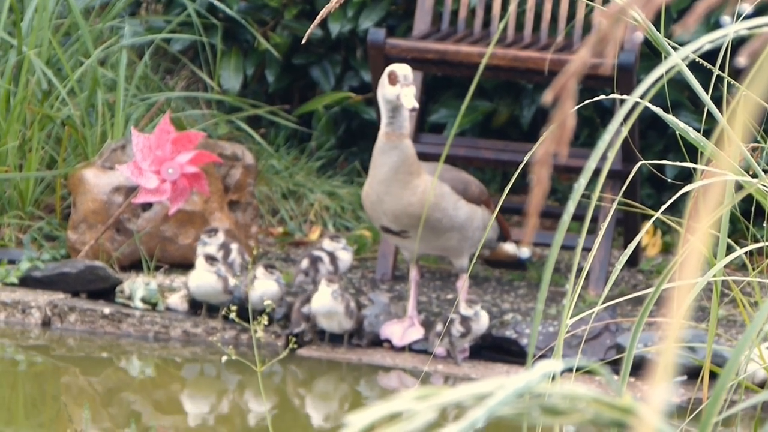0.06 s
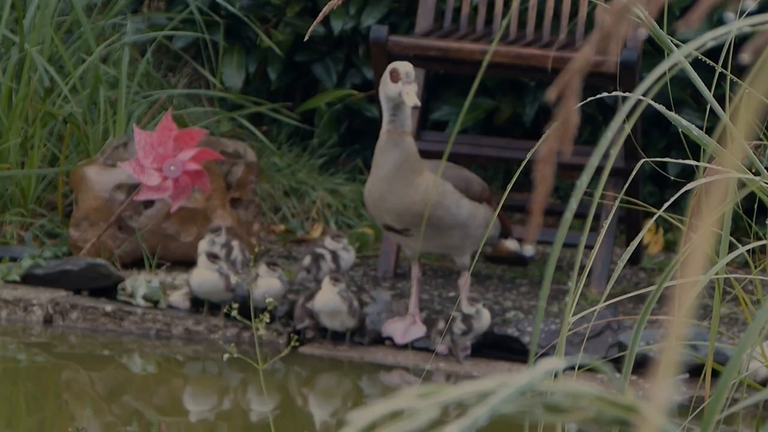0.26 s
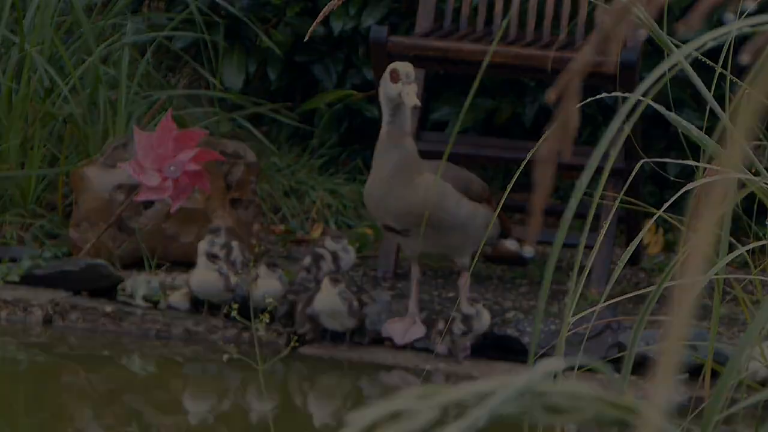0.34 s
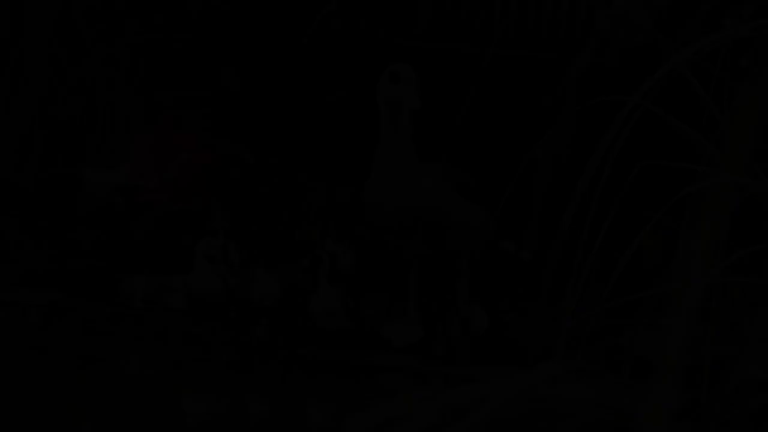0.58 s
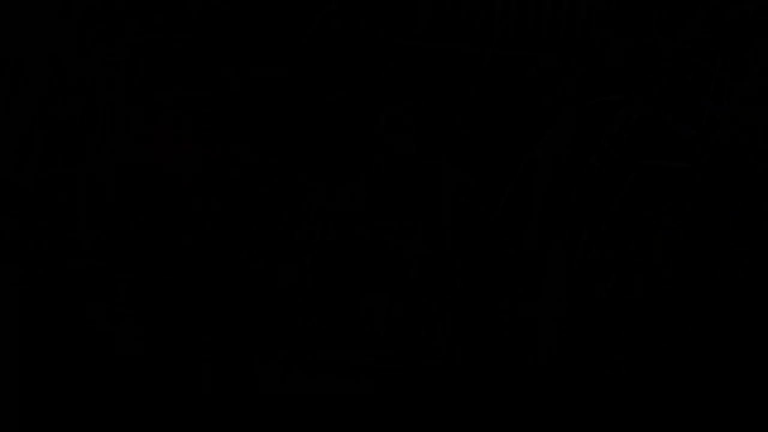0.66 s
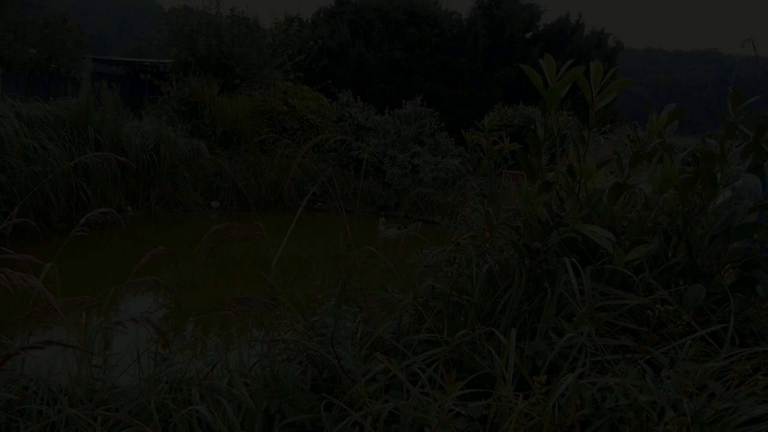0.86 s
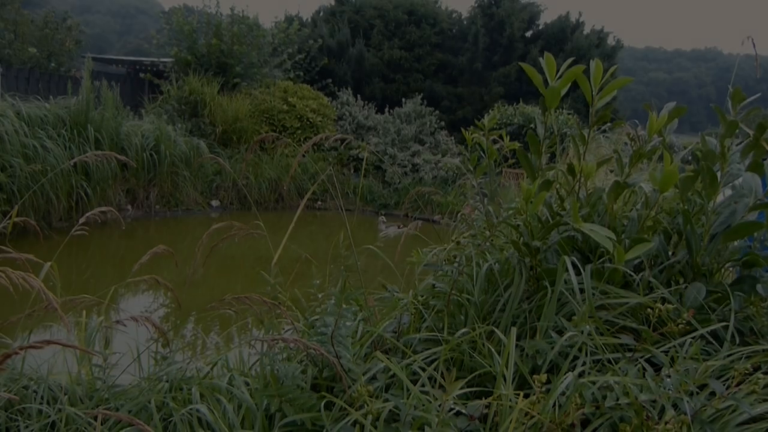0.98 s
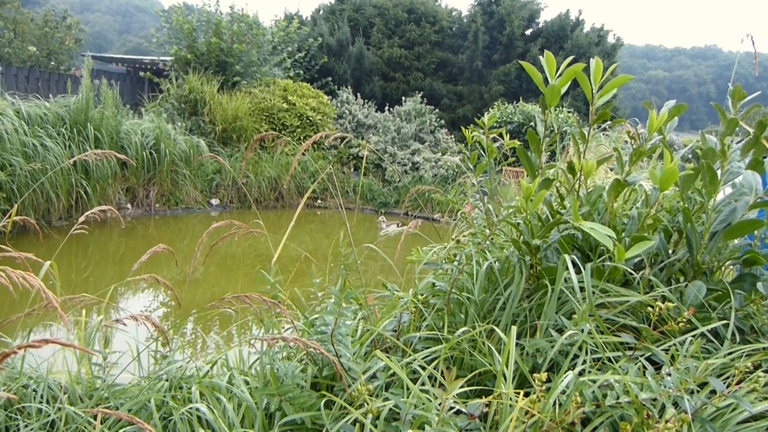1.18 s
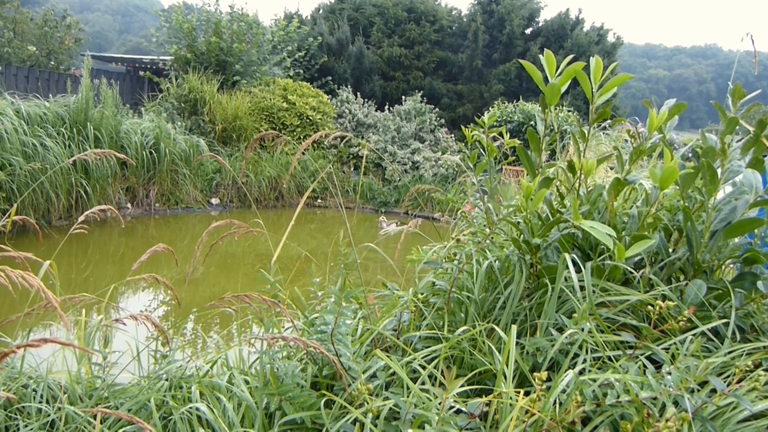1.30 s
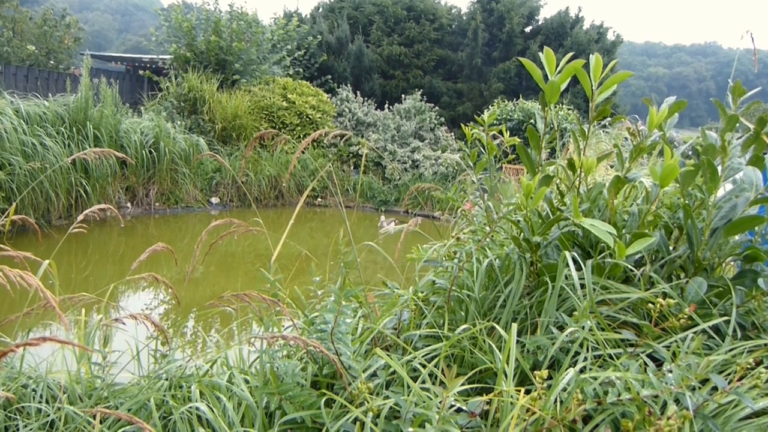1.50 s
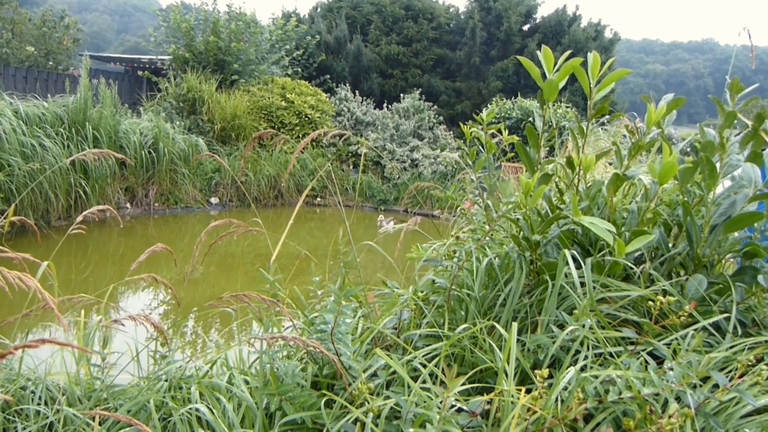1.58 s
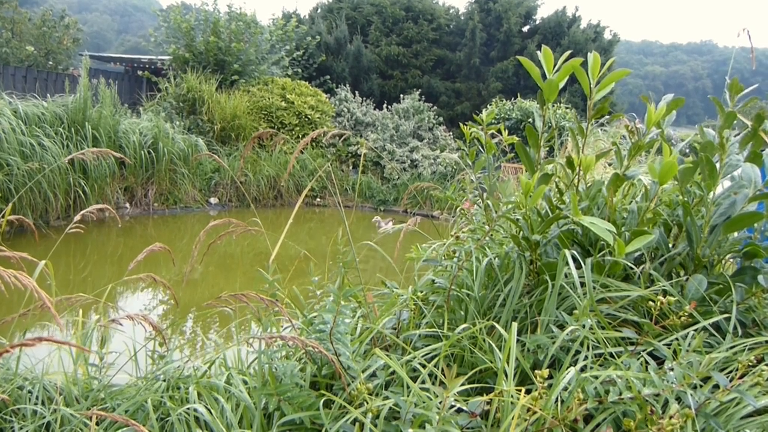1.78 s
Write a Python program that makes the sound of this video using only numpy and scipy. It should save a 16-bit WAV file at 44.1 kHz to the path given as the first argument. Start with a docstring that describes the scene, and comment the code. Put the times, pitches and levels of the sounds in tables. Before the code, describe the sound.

One brief, hoarse goose honk sounds over a quiet, steady garden hush with light grass rustles and ticks. After a thin, faint gosling peep comes a lower-key, breathy rasp from the goose, then a dull bump.

```python
"""Over a steady garden hush, grass stirs and a goose beside a pond gives one short, hoarse honk:
pulses and breath ringing its windpipe, beak and throat. Small ticks and rustles dot the scene.
The hush drops out for an instant and returns fuller with a faint thump, and a gosling peeps thinly.
The goose adds a softer, husky rasp of fluttering air; a soft bump and rustle come last.
Hard surfaces nearby answer briefly."""
import sys
import numpy as np
from scipy import signal
from scipy.fft import irfft
from scipy.io import wavfile
from scipy.ndimage import uniform_filter1d

SR = 44100
rng = np.random.default_rng(int(sys.argv[2]) if len(sys.argv) > 2 else 0)


def wav_out(sig):
    """Save sig, one row per channel (or a flat mono array), as 16-bit PCM at SR to the path in sys.argv[1]."""
    wavfile.write(sys.argv[1], SR, np.round(np.clip(np.atleast_2d(sig).T, -1, 1) * 32767).astype(np.int16))


N = 81585
T = np.arange(N) / SR
DROPOUT_START_S, DROPOUT_END_S = .7205, .7413


def amp(db):
    """Decibels to gain."""
    return 10 ** (np.asarray(db) / 20)


def unit(x):
    """Scales to rms 1."""
    return x / np.sqrt(np.mean(x ** 2) + 1e-20)


def read(points, hz):
    """Reads a table on a log-frequency axis."""
    f, value = np.transpose(points)
    return np.interp(np.log(hz + 1), np.log(f + 1), value)


def level(s, db):
    """A fader ride through the given points, silent outside them."""
    return amp(np.interp(T, s, db, left=-140, right=-140))


def wander(size):
    """Random drift of rms 1, smoothed over `size` samples."""
    return unit(uniform_filter1d(uniform_filter1d(rng.standard_normal(N), size), size))


def colour(x, points):
    """Minimum-phase EQ of energy 1: the points set the tone, not the overall level."""
    log_gain = np.log(amp(read(points, abs(np.fft.fftfreq(8192, 1 / SR)))))
    taps = np.fft.ifft(np.exp(np.conj(signal.hilbert(log_gain)))).real[:2048]
    return signal.fftconvolve(x, taps / np.linalg.norm(taps))[:N]


def slide(x, points, span_s, first, last):
    """Crossfades three tunings of an EQ, moving its peaks from `first` to `last` times their pitch."""
    progress = np.interp(T, span_s, [0, 1])
    out = 0
    for step in (0, .5, 1):
        fade = np.maximum(1 - 2 * abs(progress - step), 0)
        tuning = first + (last - first) * step
        out = out + colour(x * fade, [(hz * tuning, db) for hz, db in points])
    return out


def resonate(x, hz, width_hz):
    """Two like resonators in series, centred on a fixed or moving frequency."""
    carrier = np.exp(2j * np.pi * np.cumsum(hz * np.ones(N)) / SR)
    pole = np.exp(-np.pi * width_hz / SR)
    for _ in range(2):
        x = 2 * (carrier * signal.lfilter([1 - pole], [1, -pole], x / carrier + 1e-18)).real
    return x


def pulses(cycles):
    """A sharp pulse at each whole cycle, placed between samples; rms 1."""
    out = np.zeros(N)
    for i in np.flatnonzero(np.diff(np.floor(cycles)) > 0):
        near = np.arange(max(i - 12, 0), min(i + 13, N))
        offset = near - i - (np.floor(cycles[i + 1]) - cycles[i]) / (cycles[i + 1] - cycles[i])
        out[near] += np.sinc(offset) * np.cos(np.pi * offset / 26) ** 2
    return unit(out)


def strike(start_s, decay_s):
    """An envelope that jumps up and dies away."""
    return (T >= start_s) * np.exp(-np.maximum(T - start_s, 0) / decay_s)


def swell(peak_s, half_width_s):
    """A bell-shaped envelope."""
    return np.exp(-((T - peak_s) / half_width_s) ** 2)


def pan(x, left_db=0):
    """Mono to stereo, with the left side `left_db` above the right."""
    return x * amp([[left_db / 2], [-left_db / 2]])


def reflections(x, wet_db):
    """Hard surfaces nearby add a short, sparse tail, each band dying at its own speed."""
    # Decay to -60 dB: frequency_hz, decay_s
    decay = [(150, 0.46), (400, 0.15), (1100, 0.37), (1800, 0.33), (2800, 0.17), (5000, 0.27), (8500, 0.22),
             (14000, 0.16)]
    # Likeness of left and right: frequency_hz, correlation
    likeness = [(150, 1), (350, 0.56), (600, 0.46), (1200, -0.19), (2500, 0.59), (8000, 0.82)]
    predelay_s, build_s = .0031, .0011
    t = np.arange(SR // 2) / SR
    echoes = rng.choice([-1., 1.], (2, len(t))) * (rng.random((2, len(t))) < .1)
    onset = np.clip((t - predelay_s) / build_s, 0, 1) ** .5
    hz, age_s, bands = signal.stft(echoes * onset, SR, nperseg=256)
    same = np.clip(read(likeness, hz), -1, 1)[:, None]
    mid, side = bands[0] * np.sqrt(1 + same), bands[1] * np.sqrt(1 - same)
    fade = amp(-60 * age_s / read(decay, hz)[:, None])
    tail = signal.istft(np.array([mid + side, mid - side]) * fade, SR, nperseg=256)[1]
    return x + amp(wet_db) * signal.fftconvolve(x, tail / np.linalg.norm(tail[0]), axes=1)[:, :N]


def hush(spectrum, level_db):
    """A wide, steady bed of garden noise with faint drifting patches."""
    # Stereo width: frequency_hz, side_over_mid_db
    width = [(60, -3), (170, -7), (330, 3), (600, 2), (1000, 0), (2400, -1.5), (4500, -1.5), (8000, -9.5),
             (14000, -26)]
    hz = np.fft.rfftfreq(1024, 1 / SR)
    mid_re, mid_im, side_re, side_im, patches = rng.standard_normal((N // 256 + 5, len(hz), 5)).T
    dip_db = unit(uniform_filter1d(uniform_filter1d(patches, size=10, axis=0), size=10, axis=1))
    bands = np.array([mid_re + 1j * mid_im, (side_re + 1j * side_im) * amp(read(width, hz))[:, None]])
    bands *= amp(read(spectrum, hz)[:, None] - dip_db)
    mid, side = signal.istft(bands, nperseg=1024, noverlap=768)[1][:, :N]
    return amp(level_db) * unit(np.array([mid + side, mid - side]))


def rustles():
    """Grass rubs in brief swells of fine, grainy friction."""
    # Stirs of the grass: start_s, length_s, level_db
    stirs = [(0.17, 0.018, -60), (0.381, 0.049, -58), (1.095, 0.012, -56), (1.273, 0.036, -63),
             (1.668, 0.078, -62), (1.773, 0.08, -56)]
    # Friction EQ: frequency_hz, gain_db
    grass_eq = [(60, -59), (500, -8), (2500, -1.5), (4500, -5), (7200, 2.5), (8700, -0.5), (10800, 4),
                (12500, -5.5), (16000, -14)]
    envelope = 0
    for start_s, length_s, db in stirs:
        arch = np.sin(np.pi * np.clip((T - start_s) / length_s, 0, 1))
        envelope = envelope + amp(db) * np.sqrt(np.maximum(arch, 0))
    grain = unit(rng.standard_normal(N) * amp(1.6 * wander(size=40)))
    return pan(colour(grain * envelope, grass_eq))


def honk():
    """Hoarse pulses and breath ring windpipe and beak, then the throat; the closing beak darkens it."""
    # Shape of the call: time_s, pitch_hz, nasal_db, throat_db, treble_db
    call = [(.198, 146.3, -52, -57, -60), (.206, 150.1, -41, -56, -42.5), (0.218, 156.8, -34, -52, -38),
            (0.227, 160.3, -31, -43, -35.5), (0.237, 162.3, -37, -42, -38), (.252, 163.4, -44, -39, -50),
            (0.269, 160, -46.5, -45, -45), (0.282, 144.6, -43, -48, -49.5), (0.297, 138.1, -65, -59, -67)]
    # Nasal resonances: frequency_hz, gain_db
    nasal_eq = [(300, -30), (850, -25), (1120, -4.5), (1320, -13.5), (1590, 5), (1750, -0.5), (1900, 8),
                (2100, -10), (2400, -4.5), (2750, -27), (3400, -34), (5000, -48), (11000, -69)]
    # Steady windpipe resonances: frequency_hz, gain_db
    windpipe_eq = [(1500, -40), (3300, -17), (3900, -9), (4560, -14), (4840, 10), (5100, -13), (6100, -12),
                   (6800, -18), (9000, -42), (11000, -65)]
    # Resonances of the wide-open beak: frequency_hz, gain_db
    beak_eq = [(4500, -50), (6800, -17), (7500, -2), (8050, 3), (8500, -3), (9050, -19), (10000, -7.5),
               (10600, -19), (11700, -52), (12500, -23), (13300, -18), (14300, -33), (16000, -32)]
    # Resonances of the low throat tone: frequency_hz, gain_db
    throat_eq = [(90, -40), (160, -8.5), (320, -11), (490, -0.5), (640, -5.5), (800, -15.5), (1110, -4),
                 (1400, -16), (1900, -0.5), (2400, -11), (2900, -24), (4850, -6.5), (11000, -46)]
    start_s, jitter, shimmer_db = .1986, .007, .8
    opening_s, shutting_s = (.205, .236), (.223, .274)
    s, hz, nasal_db, throat_db, treble_db = np.transpose(call)
    pitch = np.interp(T, s, hz) * (1 + jitter * wander(size=200))
    cycles = np.cumsum(pitch) / SR
    cycles -= np.interp(start_s, T, cycles)  # a pulse lands right on the attack
    buzz = pulses(cycles) * amp(shimmer_db * wander(size=200))
    puffs = unit(np.exp(-(cycles % 1)) * rng.standard_normal(N))
    nasal_drive = (buzz + amp(-6.5) * puffs) * level(s, nasal_db)
    nasal = slide(nasal_drive, nasal_eq, opening_s, first=.912, last=1)
    treble_drive = (buzz + amp(-8) * puffs) * level(s, treble_db)
    windpipe = amp(-3) * colour(treble_drive, windpipe_eq)
    beak = amp(-2.5) * slide(treble_drive, beak_eq, shutting_s, first=1, last=.932)
    throat = colour(buzz * level(s, throat_db), throat_eq)
    closing_ring = unit(resonate(buzz + puffs, hz=1103, width_hz=240))
    closing_ring *= amp(-44) * swell(peak_s=.2938, half_width_s=.025)
    voice = windpipe_smear(nasal + windpipe + beak) + closing_ring
    return reflections(pan(voice), wet_db=-6) + reflections(pan(throat), wet_db=1)


def windpipe_smear(x):
    """The long windpipe delays each frequency differently, so a pulse becomes a short burst."""
    ripple = unit(uniform_filter1d(uniform_filter1d(rng.standard_normal(1025), size=32), size=32))
    delay_s = .0006 * (1 + .57 * ripple)
    burst = irfft(np.exp(-2j * np.pi * np.cumsum(delay_s) * SR / 2048))[:512]
    return signal.fftconvolve(x, burst)[:N]


def ticks():
    """Tiny snaps, each a bright noise burst gone in milliseconds."""
    # Snaps: start_s, level_db, decay_s, left_over_right_db
    snaps = [(0.494, -54, 0.0023, -2), (.534, -54.5, .002, 1), (0.959, -58, 0.0025, -5),
             (1.03, -45.5, 0.0011, 11.5), (1.0949, -45, 0.0022, 7.5), (1.658, -35.5, .0012, 5),
             (1.7118, -50, 0.0015, -12)]
    # Snap EQ: frequency_hz, gain_db
    snap_eq = [(40, -31), (300, 1), (1200, -4.5), (2600, -8.5), (4500, -3.5), (6700, 3.5), (8500, -1.5),
               (10500, 0.5), (13000, -9), (16000, -29)]
    out = 0
    for start_s, db, decay_s, left_db in snaps:
        burst = rng.standard_normal(N) * amp(db) * strike(start_s, decay_s)
        out = out + pan(colour(burst, snap_eq), left_db)
    return out


def peep():
    """The gosling's thin, slightly wavering whistle."""
    # Shape of the whistle: time_s, pitch_hz, level_db
    whistle = [(.812, 5030, -72), (.829, 4950, -69), (.840, 4840, -66), (0.866, 4940, -66),
               (.889, 4966, -60.5), (.896, 5000, -84)]
    s, hz, db = np.transpose(whistle)
    pitch = np.interp(T, s, hz) * (1 + .0048 * wander(size=150))
    return pan(np.sqrt(2) * np.sin(2 * np.pi * np.cumsum(pitch) / SR) * level(s, db))


def rasp():
    """Uneven flutter and air ring the goose's throat; its resonances waver and rise with effort."""
    # Levels of the husky core and the resonances flanking it: time_s, core_db, flank_db
    call = [(1.300, -62.5, -75), (1.328, -47, -56.5), (1.35, -54.5, -55.5), (1.372, -43.5, -50.5),
            (1.415, -49.5, -51), (1.441, -41.5, -51), (1.478, -45, -42), (1.499, -37, -50.5),
            (1.538, -36.5, -47.5), (1.553, -39.5, -51), (1.569, -36.5, -63), (1.583, -39.5, -57),
            (1.6, -55, -63), (1.63, -45.5, -58), (1.655, -81, -72)]
    # The slowing flutter: time_s, rate_hz
    flutter_rate = [(1.38, 165), (1.52, 110)]
    # Throat resonances: centre_hz, half_width_hz, gain_db, core_share (0-1)
    modes = [(652, 49, -7.5, 0.72), (1004, 20, -6, 0.89), (1043, 38, -5.5, 0.87), (1146, 46, -4.5, 0.79),
             (1259, 36, -6.5, 0.68), (1397, 62, -11.5, 0.52), (1717, 67, -4, 0.02)]
    # Air through the beak: time_s, level_db
    breath_curve = [(1.31, -71), (1.352, -65), (1.374, -53.5), (1.42, -59.5), (1.48, -52.5), (1.54, -51),
                    (1.585, -55), (1.62, -59), (1.649, -62)]
    # Breath EQ: frequency_hz, gain_db
    breath_eq = [(500, -49), (1000, 0), (2000, 4), (2600, -1), (3300, -5), (4100, 1), (4900, 3),
                 (5700, -0.5), (6400, -1.5), (7300, -5), (8100, -4), (9200, -12.5), (10500, -4.5),
                 (13000, -17), (16000, -25)]
    jitter, effort_bend, waver, flicker_db = .2, .056, .011, 1.5
    s, core_db, flank_db = np.transpose(call)
    core, flank = level(s, core_db), level(s, flank_db)
    rate_hz = np.interp(T, *np.transpose(flutter_rate)) * np.exp(jitter * wander(size=100))
    cycles = np.cumsum(rate_hz) / SR
    flutter = pulses(cycles)
    puffs = unit((.5 + np.exp(-(cycles % 1))) * rng.standard_normal(N))
    tuning = 1 + effort_bend * (core / core.max() - .5)
    husk = 0
    for hz, half_width_hz, db, share in modes:
        centre_hz = hz * tuning * (1 + waver * wander(size=1300))
        ring = resonate(flutter + .56 * puffs, centre_hz, 2 * half_width_hz)
        ring /= np.sqrt(uniform_filter1d(ring ** 2, size=1300) + 1e-12)  # evens out the level
        envelope = share * core + (1 - share) * flank
        husk = husk + amp(db + flicker_db * wander(size=900)) * ring * envelope
    breath = colour(puffs * level(*np.transpose(breath_curve)), breath_eq)
    opening_hiss = unit(resonate(flutter + .19 * puffs, hz=4450, width_hz=920))
    opening_hiss *= amp(-52) * swell(peak_s=1.383, half_width_s=.022)
    return reflections(pan(husk + breath + opening_hiss), wet_db=-5.5)


def bump():
    """A dull knock with a low thud, running on into a soft scrape."""
    # Body of the knock: frequency_hz, gain_db
    knock_eq = [(60, -25), (140, -6), (320, -16), (530, 0), (680, 3), (820, -10), (1100, -4), (1900, -11),
                (2800, -20), (10000, -26)]
    # Scrape EQ: frequency_hz, gain_db
    scrape_eq = [(50, -26), (350, -8), (520, 7.5), (800, -4), (1120, 7.5), (1430, 7), (2400, -11),
                 (5000, -8.5), (6400, -6), (9000, -47), (15000, -46)]
    start_s, decay_s, scrape_rise_s = 1.7745, .012, .0038
    thud_hz, thud_rise_s = 142, .012
    hit = strike(start_s, decay_s)
    knock = colour(rng.standard_normal(N) * amp(-44.5) * hit, knock_eq)
    fade_in = np.clip((T - start_s) / scrape_rise_s, 0, 1)
    scrape = colour(rng.standard_normal(N) * amp(-55.5) * fade_in, scrape_eq)
    soft_hit = hit * (1 - strike(start_s, thud_rise_s))
    thud = amp(-41.5) * soft_hit * np.sin(2 * np.pi * thud_hz * (T - start_s))
    return reflections(pan(knock + scrape, left_db=-6.5), wet_db=.5) + thud


def scene():
    """Goose, gosling and small sounds over a garden bed that changes tone at the dropout."""
    # Opening hush: frequency_hz, relative_db
    early_eq = [(15, -35), (25, 15), (64, -37), (110, -15.5), (160, -4.5), (240, -13.5), (320, -8),
                (451, -8), (659, -4), (1610, -16), (1790, -18), (2910, -23), (9070, -22), (16000, -30.5)]
    # Later hush, fuller in the lows: frequency_hz, relative_db
    late_eq = [(15, -24), (25, 5), (64, -23), (115, -3.5), (190, 3.5), (280, -1), (575, -1.5), (818, -3.5),
               (936, -1), (1790, -11.5), (1940, -11.5), (3250, -18.5), (5000, -14.5), (5880, -16.5),
               (9570, -16.5), (16000, -25)]
    garden = np.where(T < DROPOUT_START_S, hush(early_eq, -54.5), hush(late_eq, -55))
    goose = honk() + rasp()
    gosling_and_grass = reflections(peep() + rustles(), wet_db=-2)
    return garden + goose + gosling_and_grass + reflections(ticks(), wet_db=-5.5) + bump()


def record(dry):
    """The mix drops out for an instant and returns with a faint thump; the very top is rolled off."""
    dropout = np.where((T > DROPOUT_START_S) & (T < DROPOUT_END_S), amp(-29), 1)
    thump = -amp(-50.5) * strike(DROPOUT_END_S, decay_s=.22)
    lowpass = signal.firwin(511, cutoff=16000, window=("kaiser", 9), fs=SR)
    return signal.oaconvolve(dry * dropout + thump, lowpass[None], "same")


dry = scene()
out = record(dry)
wav_out(out)
```